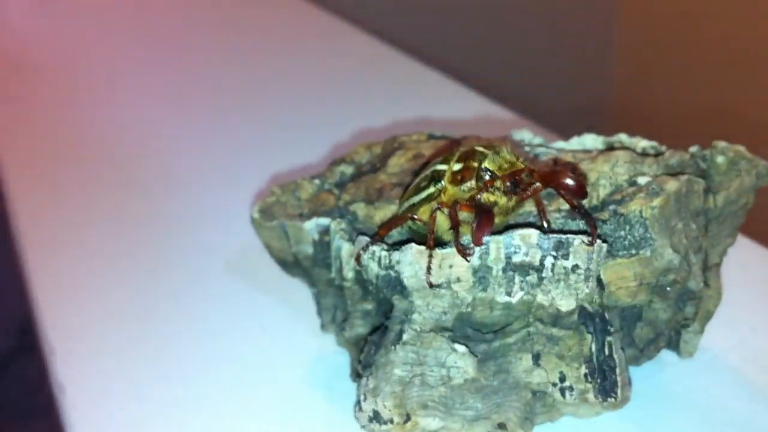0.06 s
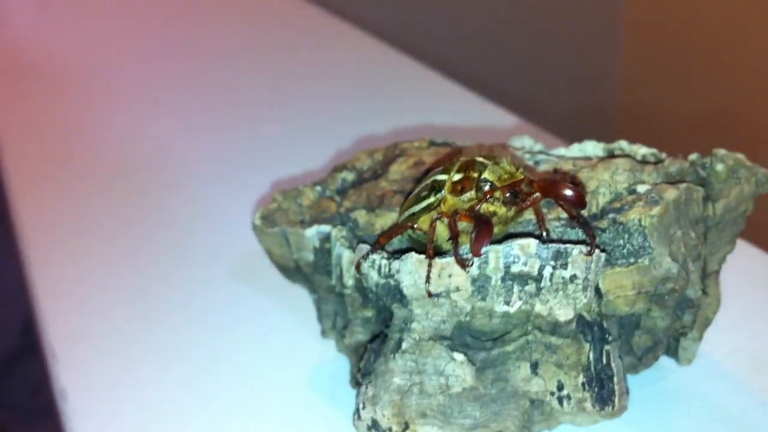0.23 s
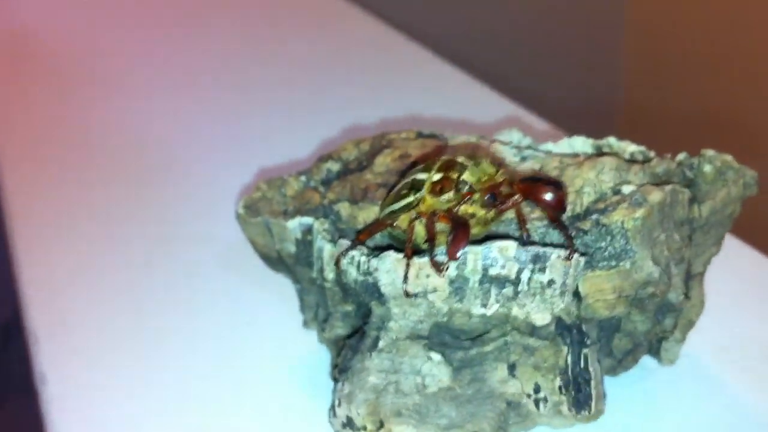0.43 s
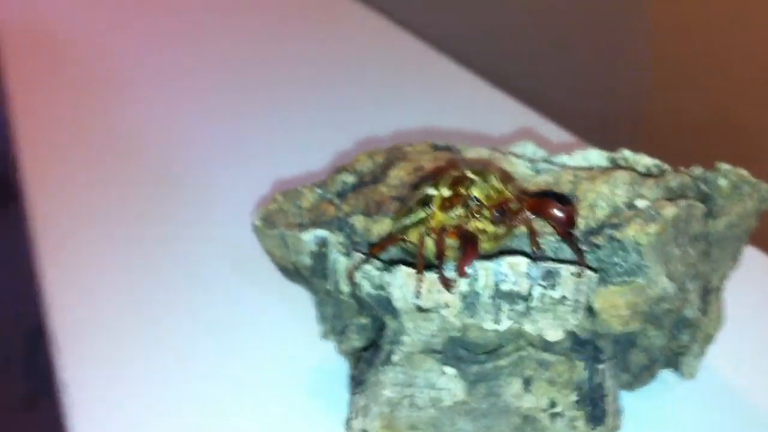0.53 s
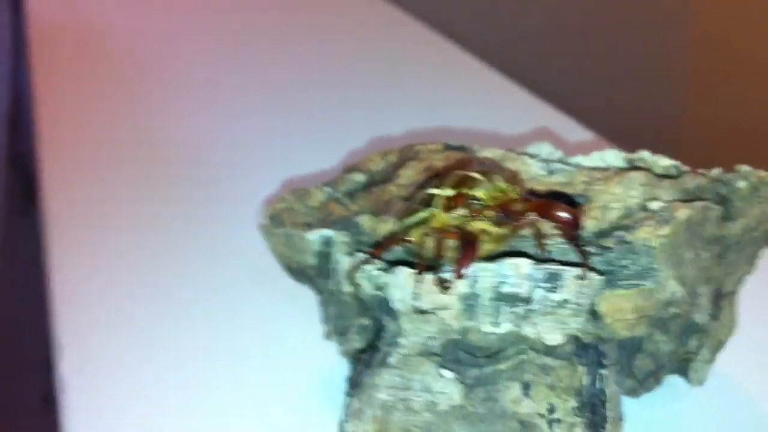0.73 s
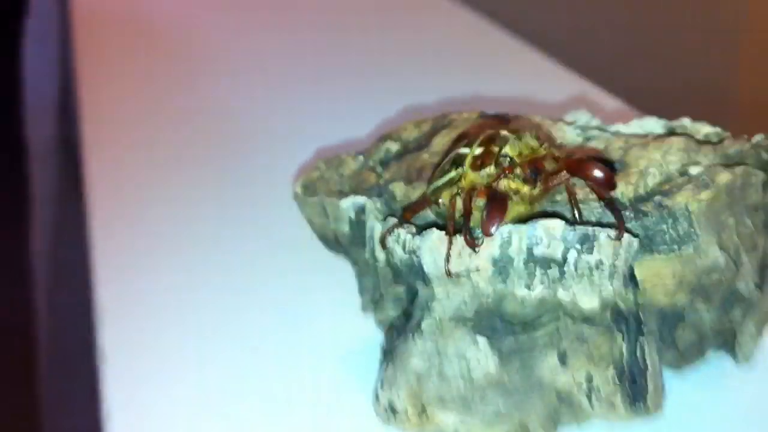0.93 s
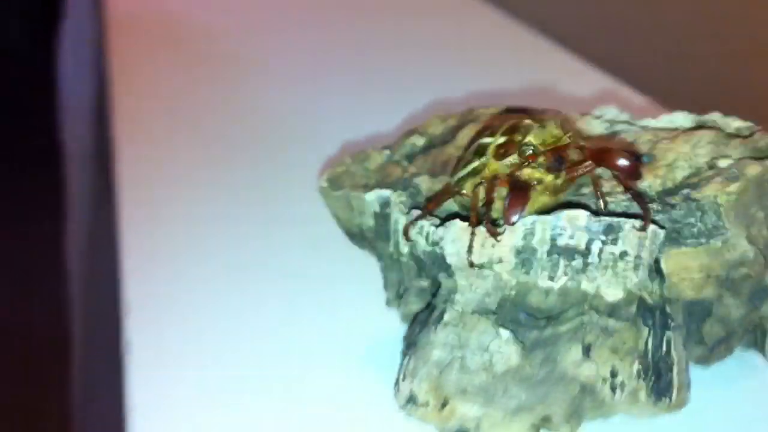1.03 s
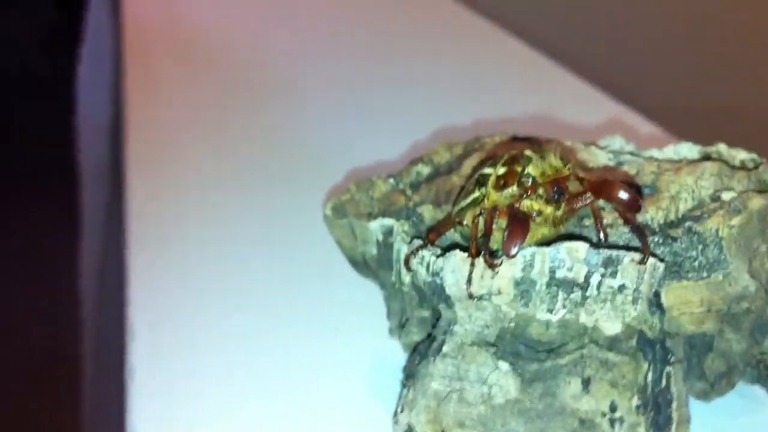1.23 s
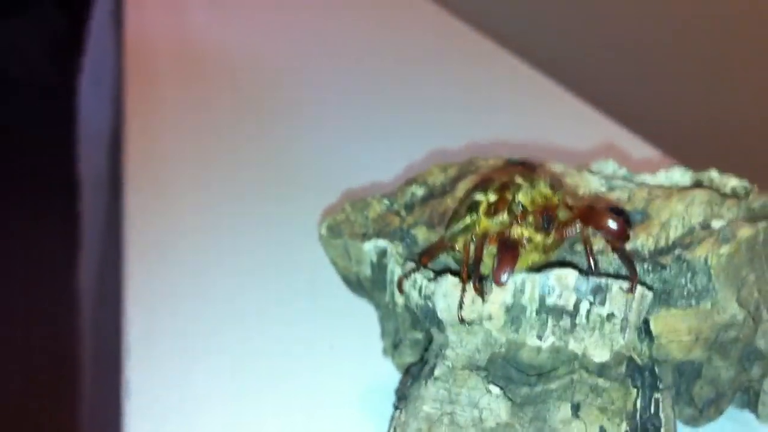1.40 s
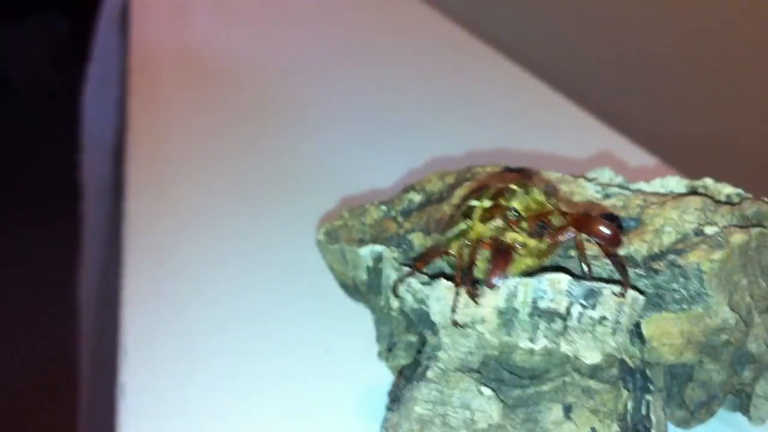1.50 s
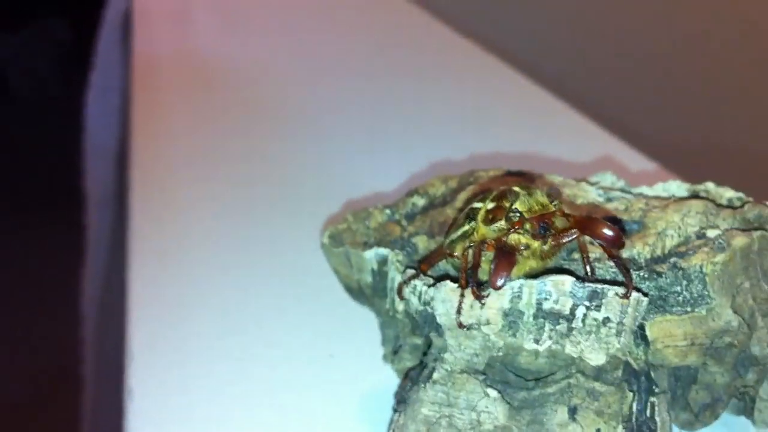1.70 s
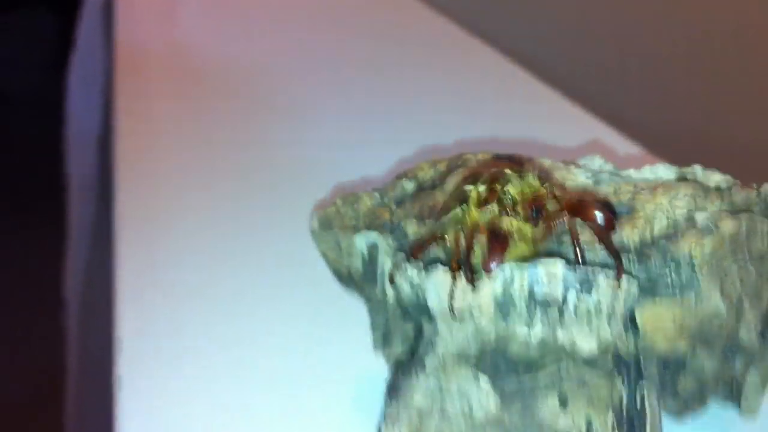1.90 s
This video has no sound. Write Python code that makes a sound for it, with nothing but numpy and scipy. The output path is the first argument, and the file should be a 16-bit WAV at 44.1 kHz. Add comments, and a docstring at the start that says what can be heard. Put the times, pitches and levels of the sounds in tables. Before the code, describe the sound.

Close up in a quiet room, a disturbed beetle gives two runs of faint, bright, grainy hissing. A scuff and two loud, dead camera knocks lead in, then handling rubs, small ticks and table bumps sound over a low hum.

```python
"""A quiet room, close to a beetle on a piece of bark. Disturbed, it hisses in uneven, breathy pushes:
bright, grainy air with a narrow resonance and, in the last strong push, a faint falling whistle.
Handling of a hand-held camera adds dull rubbing, a scuff, a scrape and three dead knocks on its case,
two sharp and one faint. Light ticks and a soft stumble of bumps on the table ring briefly.
Underneath lies a bed of room air, faint hums and steady appliance tones."""
import sys
import numpy as np
from scipy import signal
from scipy.fft import rfft, irfft
from scipy.io import wavfile
from scipy.ndimage import uniform_filter1d

SR = 44100
rng = np.random.default_rng(int(sys.argv[2]) if len(sys.argv) > 2 else 0)


def store_pcm(level_fs):
    """Save levels as 16-bit WAV."""
    pcm = np.round(np.clip(level_fs, -1, 1) * 32767).astype(np.int16)
    wavfile.write(sys.argv[1], SR, np.atleast_2d(pcm).T)


N = 85995

# Envelopes of the hiss. Each row: time in seconds, relative level in dB.
FIRST_PUFF = [(0.005, -78), (0.03, -71.5), (0.055, -73), (0.085, -82.5)]
AIR_PUSHES = [
    [(0.42, -71), (0.476, -53.5), (0.494, -53.5), (0.66, -67), (0.686, -60.5), (0.784, -59), (0.836, -68),
     (0.944, -64), (0.968, -71), (0.978, -60), (0.99, -60.5), (1.04, -78), (1.108, -54.5), (1.136, -68.5),
     (1.198, -69), (1.208, -63), (1.322, -70), (1.356, -62), (1.376, -85), (1.39, -81)],
    [(1.53, -92), (1.57, -68), (1.628, -68), (1.654, -58.5), (1.684, -60.5), (1.72, -73.5), (1.734, -71),
     (1.756, -79), (1.764, -72), (1.826, -66), (1.852, -81), (1.87, -76)],
]  # one list per run of pushes
RESONANCE_PUSHES = [
    [(0.42, -65), (0.428, -72), (0.478, -53.5), (0.57, -64), (0.628, -58.5), (0.656, -69), (0.702, -56.5),
     (0.884, -64.5), (0.93, -57.5), (0.97, -63), (0.978, -58), (1.014, -60.5), (1.106, -55), (1.132, -68),
     (1.234, -61.5), (1.284, -75), (1.29, -60), (1.316, -68), (1.346, -68), (1.39, -93)],
    [(1.53, -91), (1.536, -93), (1.568, -66.5), (1.632, -67), (1.646, -62), (1.688, -58.5), (1.718, -81),
     (1.732, -68), (1.772, -75), (1.786, -64.5), (1.826, -66.5), (1.86, -89), (1.866, -75), (1.87, -76)],
]  # likewise
WHISTLE_ENVELOPE = [(1.635, -74), (1.65, -64.5), (1.662, -68), (1.672, -79)]
# Tone of the hiss. Each row: frequency in Hz, gain in dB.
AIR_EQ = [(1000, -24), (2500, -6), (3600, -12.5), (4600, 0), (6000, -3.5), (7300, 0.5), (8300, 1),
          (9400, 2), (10400, -3), (13500, -0.5), (16000, -6.5), (18000, -20)]
RESONANCE_EQ = [(3000, -43), (4900, -15), (5500, -3.5), (5850, -2), (6150, -5), (6500, -2.5), (7100, -15),
                (8700, -12), (9350, -14.5), (9900, -24.5)]

# Knocks on the case. Each row: start in seconds, gain in dB, contact bandwidth in Hz, crack in dB,
# top of the crack in Hz, full-band splinter in dB, rebound delay in seconds, rebound share.
KNOCK_HITS = [(0.2222, 2.5, 2600, -12, 7360, -53, 0.00114, 0.24),
              (0.4079, 11.5, 1140, -21.5, 5000, -32, 0.000892, .45),
              (1.7031, -20.5, 1010, -11.5, 4000, -30, 0.00097, 0.33)]
# Body of the case. Each row: frequency in Hz, gain in dB.
CASE_EQ = [(100, -2), (260, 3), (400, 3.5), (700, 3.5), (1100, 3.5), (1600, 2), (2150, 7), (2750, 5),
           (3300, 4.5), (3900, -1), (5500, 0.5), (6700, 5), (8000, -4.5), (16000, -8.5)]

# Envelopes of the handling friction. Each row: time in seconds, relative level in dB.
RUB_ENVELOPE = [(0.42, -69), (0.47, -62), (0.54, -57.5), (0.575, -65), (0.635, -56.5), (0.66, -64.5),
                (0.695, -56.5), (0.728, -64.5), (0.77, -58), (0.83, -63), (0.88, -63.5), (0.93, -62),
                (0.965, -59.5), (1.04, -65.5), (1.10, -61), (1.135, -63), (1.16, -61.5), (1.19, -68.5),
                (1.23, -61.5), (1.34, -65.5), (1.39, -90), (1.52, -84), (1.58, -69.5), (1.63, -74.5),
                (1.685, -69), (1.73, -76), (1.815, -66), (1.86, -78)]
SCUFF_ENVELOPE = [(0.135, -92), (0.142, -53), (0.16, -53), (0.176, -63), (0.19, -55)]
SCRAPE_ENVELOPE = [(0.885, -79), (0.91, -57), (0.94, -60), (0.96, -75), (0.975, -70)]
# Tone of that friction. Each row: frequency in Hz, gain in dB.
RUB_EQ = [(150, -15), (400, -9), (650, -2), (900, 1), (1150, -0.5), (1500, 1.5), (2100, -3.5), (2700, -7.5),
          (3500, -3), (5000, -13.5), (9000, -38)]
SCUFF_EQ = [(100, -18), (300, 11), (600, -6), (1000, 6.5), (1600, -9.5), (2600, -10.5), (4000, -30),
            (9000, -45)]
SCRAPE_EQ = [(1500, -19), (2300, 3), (2900, -3), (3600, 4), (4300, -1), (5500, -34)]

# Ticks and table bumps. Each row: start in seconds, gain in dB, brightness in dB per octave.
TICK_HITS = [(0.9791, -35, 6), (1.9014, -40.5, 1)]
BUMP_HITS = [(1.1581, -36.5, 1.5), (1.1866, -51.5, -2), (1.2043, -49.5, 0.5)]
# The modes they ring. Each row: frequency in Hz, gain in dB, time to fall 60 dB in seconds.
TICK_RING = [(326, -6, 0.03), (1360, -2, 0.014), (1970, -5, 0.013), (2320, -3.5, 0.011), (3500, -9, .007),
             (4660, -11, 0.0048), (6200, -10.5, 0.0043)]
TABLE_RING = [(148, -3, 0.15), (214.3, -2, 0.076), (265, -9, 0.062), (428, -9, 0.051), (980, -7.5, 0.016)]

# Tone of the room air. Each row: frequency in Hz, gain in dB.
ROOM_EQ = [(15, -10), (25, -21), (75, -18.5), (148, 1), (264, 1.5), (510, 0.5), (769, -5.5), (1410, -7),
           (1900, -7), (2640, -13.5), (3200, -11), (4700, -14.5), (5100, -13.5), (9320, -15),
           (10700, -17.5), (15300, -15), (17500, -18.5)]
# Wavering room hums. Each row: centre in Hz, half-width in Hz, level in dB.
ROOM_HUMS = [(209.4, 9.2, -75.5), (172, 8.2, -76.5), (410, 11, -81), (524.7, 13, -77.5)]
# Steady appliance tones. Each row: frequency in Hz, level in dB.
APPLIANCE_TONES = [(301, -71.5), (15000, -80)]

AIR_GAIN_DB, RUB_GAIN_DB, ROOM_DB = 3, 2.5, -62.5
HISS_FLUTTER_HZ = 301.2
WHISTLE_HZ, WHISTLE_FALL_HZ_PER_S, WHISTLE_WAVER_HZ = 5500, 29300, 80
CASE_LOW_HZ, CASE_LAG_HZ, REBOUND_ABOVE_HZ = 208, 1800, 1740
HANDLING_CUT_HZ, TOP_HZ = 142, 17900


def beetle_hiss():
    """Pushes of broad, slightly grainy air, edged by a narrow resonance near 6 kHz."""
    breath = sum(swell(push) for push in [FIRST_PUFF, *AIR_PUSHES])
    air = noise(colour(AIR_EQ)) * breath * undb(AIR_GAIN_DB)
    resonance = noise(colour(RESONANCE_EQ)) * sum(swell(push) for push in RESONANCE_PUSHES)
    return (air + resonance + whistle()) * grain(HISS_FLUTTER_HZ, depth_db=1.13)


def whistle():
    """A faint, wavering tone that dives during the last strong push."""
    age = np.arange(N) / SR - WHISTLE_ENVELOPE[0][0]
    waver_hz = WHISTLE_WAVER_HZ * noise(freqs() < HISS_FLUTTER_HZ)
    hz = WHISTLE_HZ - WHISTLE_FALL_HZ_PER_S * age + waver_hz
    return unit(np.sin(2 * np.pi * np.cumsum(hz) / SR)) * swell(WHISTLE_ENVELOPE)


def case_knocks():
    """Dead pulses through the case: a shorter contact is brighter, a quick rebound sounds hollow."""
    f = freqs()
    s = 1j * f / CASE_LOW_HZ
    bass_rolloff = s ** 2 / (s ** 2 + np.sqrt(2) * s + 1)
    bass_lag = (CASE_LAG_HZ - 1j * f) / (CASE_LAG_HZ + 1j * f)  # all-pass: the lows arrive late
    case = colour(CASE_EQ) * bass_rolloff * bass_lag
    spectrum = 0
    for start, db, contact_hz, crack_db, crack_hz, splinter_db, delay, share in KNOCK_HITS:
        crack_power = undb(crack_db) ** 2 * power_below(crack_hz, order=7)
        pulse = np.sqrt(power_below(contact_hz, order=4) + crack_power + undb(splinter_db) ** 2)
        rebound = share * (1 - power_below(REBOUND_ABOVE_HZ, order=3)) * np.exp(-2j * np.pi * f * delay)
        spectrum += undb(db) * pulse * (1 + rebound) * case * np.exp(-2j * np.pi * f * start)
    return low_cut(irfft(spectrum, N), hz=106, order=1)


def rubbing():
    """Rough, dull friction of the handling, with one short scuff and one brighter scrape."""
    rub = noise(colour(RUB_EQ)) * swell(RUB_ENVELOPE) * undb(RUB_GAIN_DB)
    scuff = noise(colour(SCUFF_EQ)) * swell(SCUFF_ENVELOPE)
    scrape = noise(colour(SCRAPE_EQ)) * swell(SCRAPE_ENVELOPE)
    roughness = grain(rate_hz=122.2, depth_db=1.5)
    return low_cut((rub + scuff + scrape) * roughness, HANDLING_CUT_HZ, order=2)


def taps():
    """Light hard ticks and soft bumps on the table: short rings with no deep bass."""
    ticks = sum(undb(db) * ring(start, TICK_RING, tilt) for start, db, tilt in TICK_HITS)
    bumps = sum(undb(db) * ring(start, TABLE_RING, tilt) for start, db, tilt in BUMP_HITS)
    return low_cut(ticks + bumps, HANDLING_CUT_HZ, order=6)


def room_tone():
    """A bed of still indoor air with faint wavering hums and steady appliance tones."""
    t = np.arange(N) / SR
    hums = sum(undb(db) * noise(1 / (1 + ((freqs() - hz) / width) ** 2)) for hz, width, db in ROOM_HUMS)
    appliances = sum(undb(db) * unit(np.sin(2 * np.pi * hz * t)) for hz, db in APPLIANCE_TONES)
    return undb(ROOM_DB) * noise(colour(ROOM_EQ)) + hums + appliances


def undb(db):
    """Decibels to gain."""
    return 10 ** (np.asarray(db) / 20)


def unit(x):
    """Scale to rms 1."""
    return x / np.sqrt(np.mean(x ** 2))


def freqs():
    """Frequency of each spectrum bin, at least 1 Hz."""
    return np.maximum(np.arange(N // 2 + 1) * SR / N, 1)


def colour(points):
    """EQ curve: gain per bin from (Hz, dB) points."""
    hz, db = np.array(points, float).T
    return undb(np.interp(np.log(freqs()), np.log(hz), db))


def noise(gain):
    """Noise of rms 1, shaped by a gain per bin."""
    return unit(irfft(rfft(rng.standard_normal(N)) * gain, N))


def swell(points):
    """Envelope from (s, dB) points, fading to silence outside them."""
    times, db = np.array(points, float).T
    t = np.arange(N) / SR
    soft_gate = uniform_filter1d(1. * ((t > times[0]) & (t < times[-1])), size=400)
    return undb(np.interp(t, times, db)) * soft_gate


def grain(rate_hz, depth_db):
    """Quick random flutter in level."""
    steps = rng.standard_normal(N)
    flutter = np.interp(np.arange(N) / SR * rate_hz, np.arange(N), steps)
    return unit(undb(depth_db * flutter))


def ring(start, modes, tilt):
    """Damped modes of alternating sign struck together, tilted in dB per octave about 2 kHz."""
    age = np.maximum(np.arange(N) / SR - start, 0)
    ringing = 0
    for k, (hz, db, t60) in enumerate(modes):
        gain = (-1) ** k * undb(db + tilt * np.log2(hz / 2000))
        ringing += gain * np.sin(2 * np.pi * hz * age) * np.exp(-np.log(1000) * age / t60)
    return ringing


def power_below(hz, order):
    """Power per bin that a low-pass lets through."""
    return 1 / (1 + (freqs() / hz) ** (2 * order))


def low_cut(x, hz, order):
    """High-pass that thins out the bass."""
    return signal.sosfilt(signal.butter(order, hz, "high", fs=SR, output="sos"), x)


def scene():
    """Beetle, handling and room tone in one mono mix."""
    return (beetle_hiss() + rubbing() + case_knocks() + taps() + room_tone())[None]


def record(dry):
    """A steep low-pass trims the very top."""
    return signal.sosfilt(signal.ellip(10, .2, 70, TOP_HZ, fs=SR, output="sos"), dry)


dry = scene()
out = record(dry)
store_pcm(out)
```